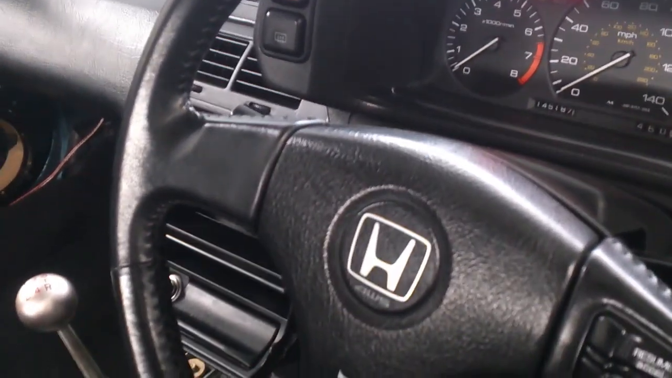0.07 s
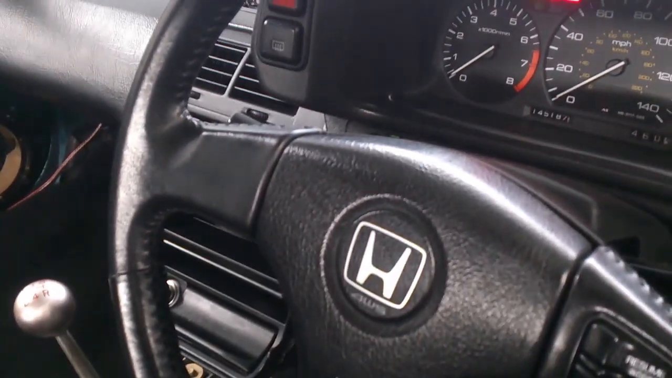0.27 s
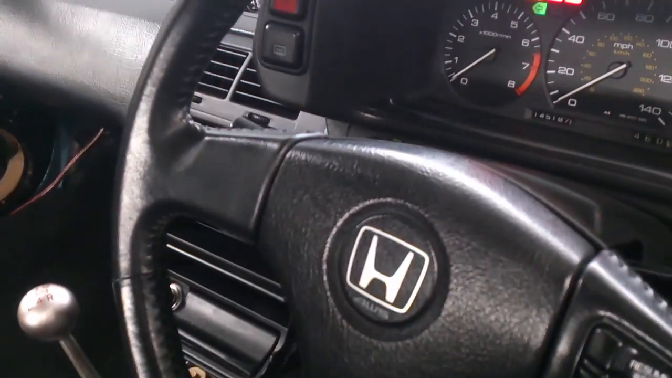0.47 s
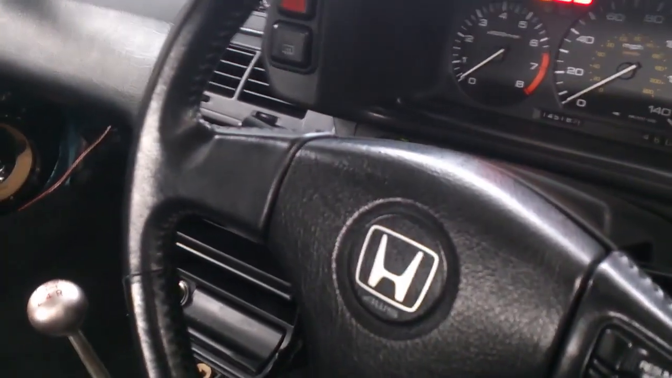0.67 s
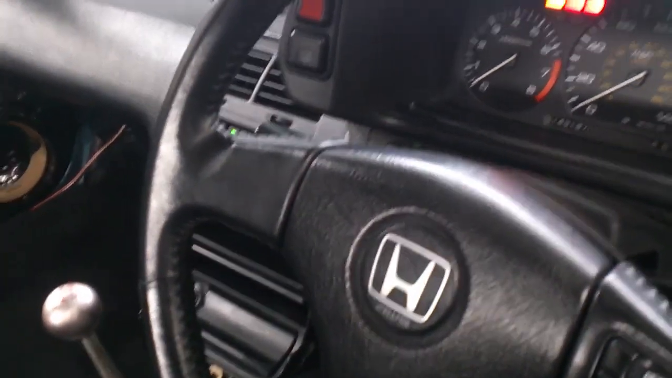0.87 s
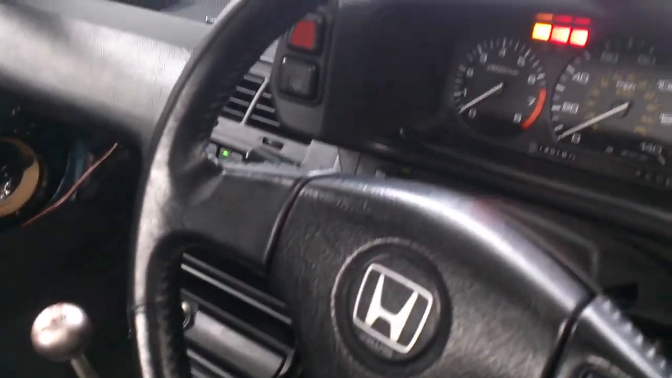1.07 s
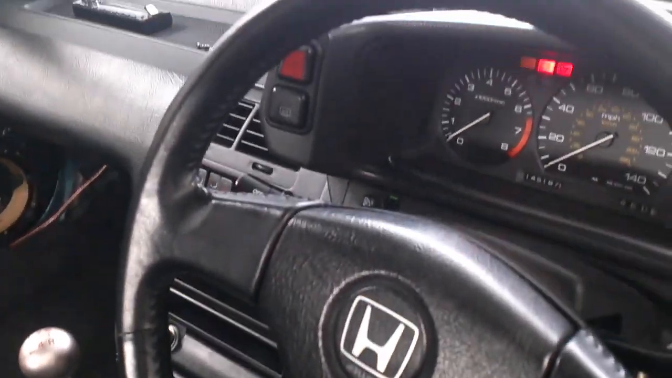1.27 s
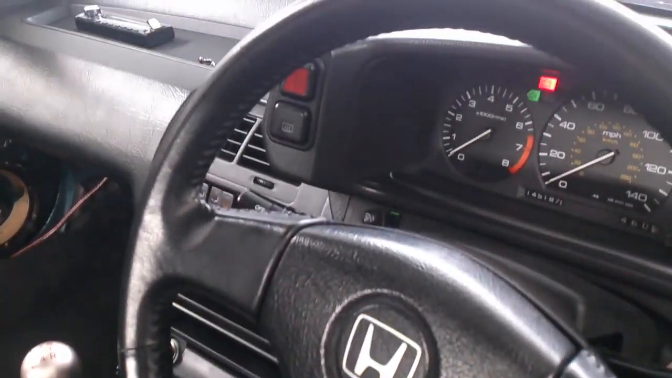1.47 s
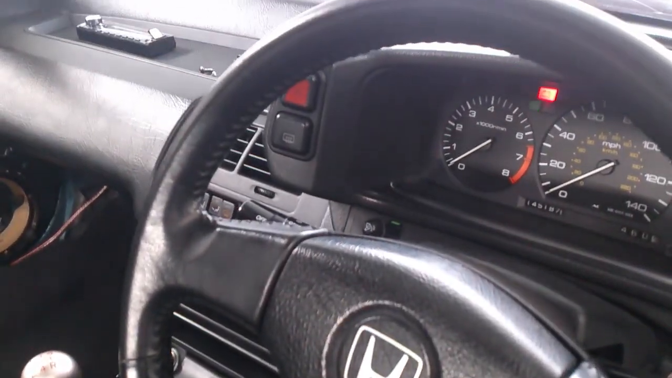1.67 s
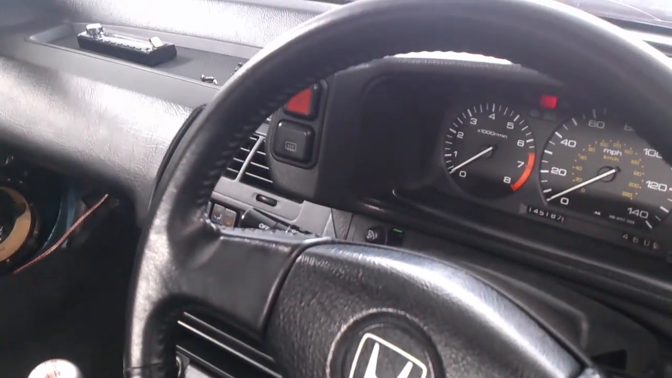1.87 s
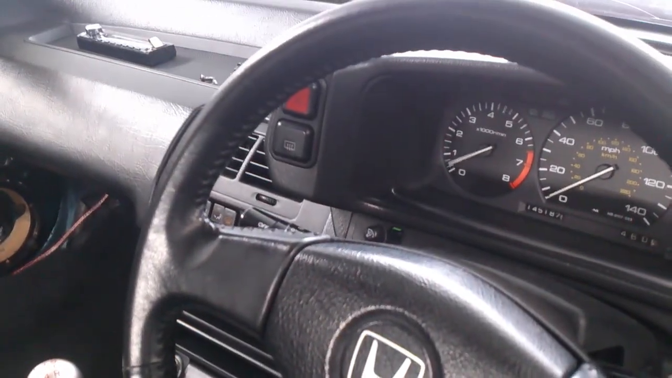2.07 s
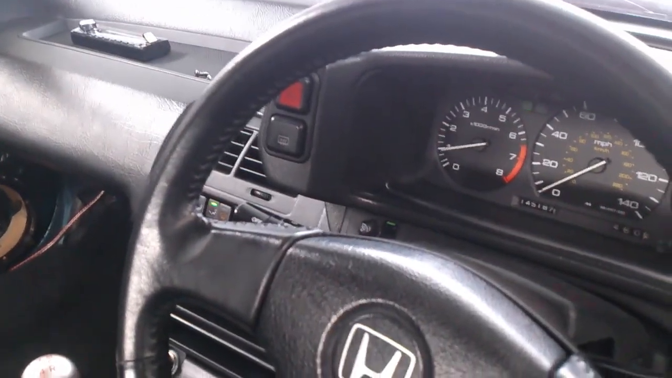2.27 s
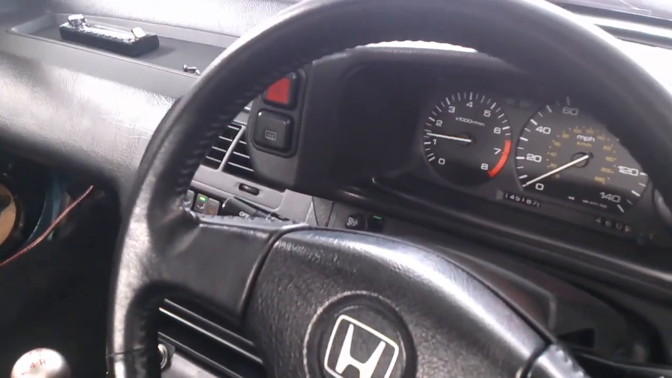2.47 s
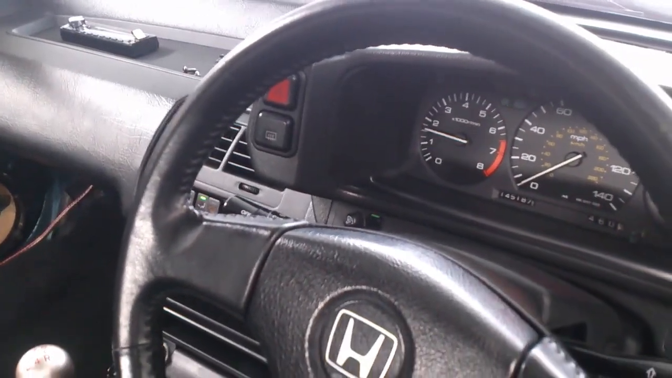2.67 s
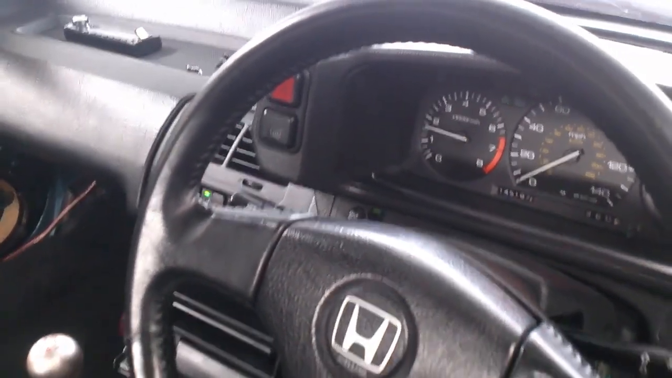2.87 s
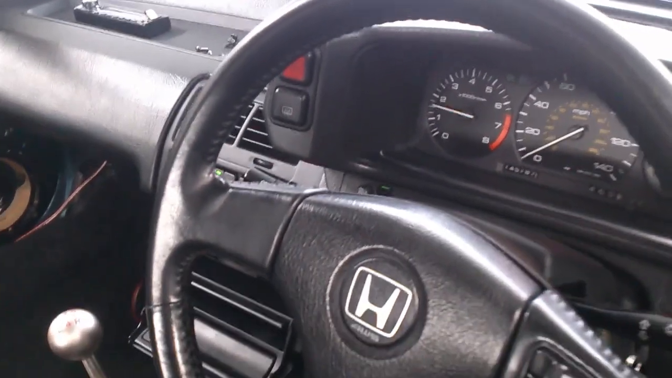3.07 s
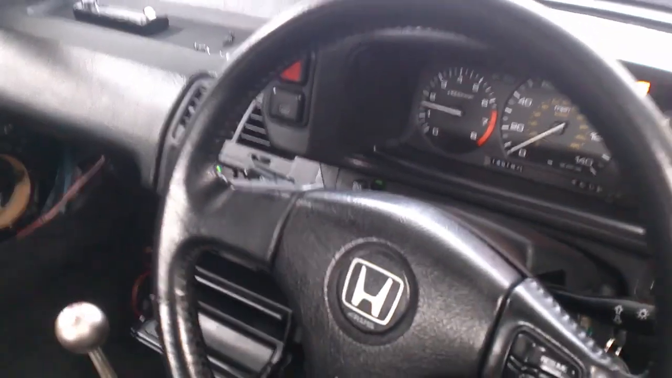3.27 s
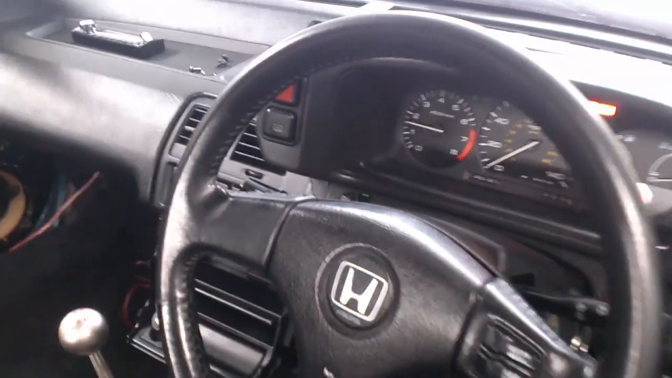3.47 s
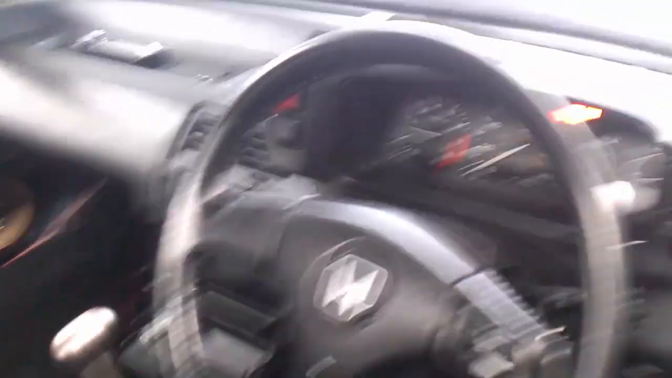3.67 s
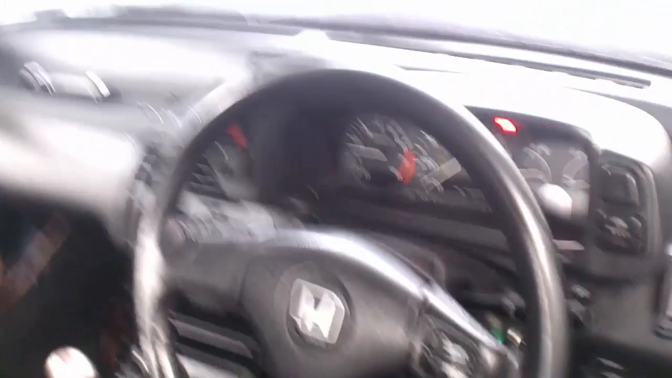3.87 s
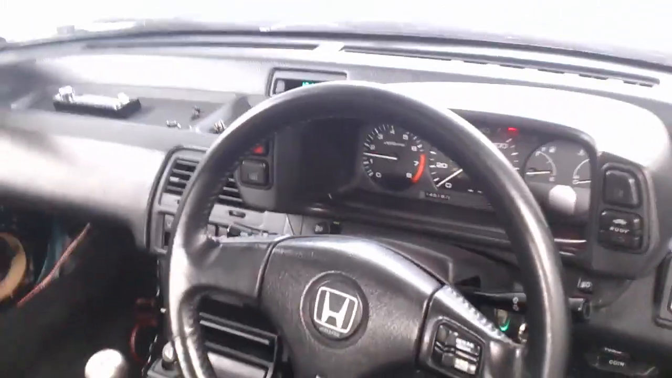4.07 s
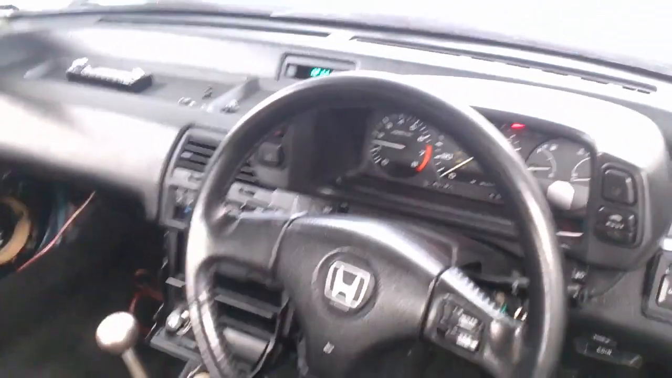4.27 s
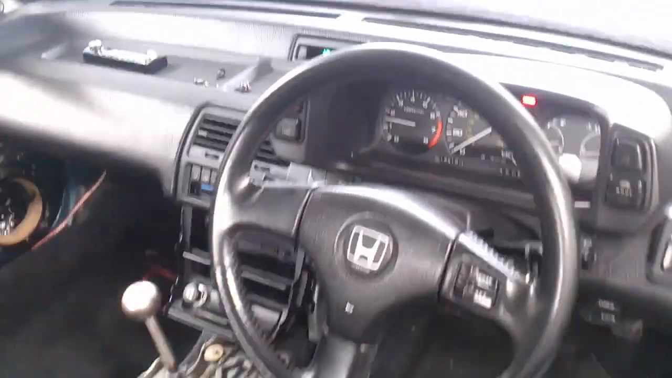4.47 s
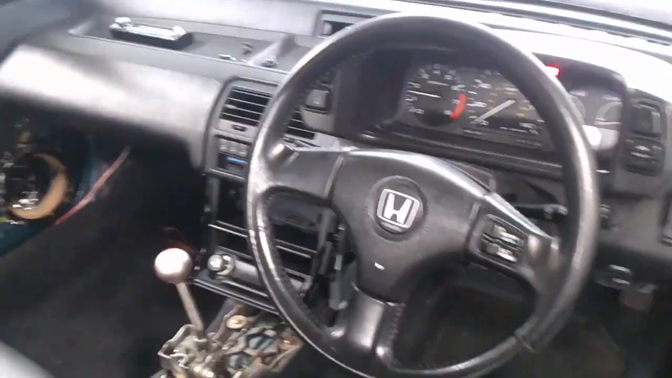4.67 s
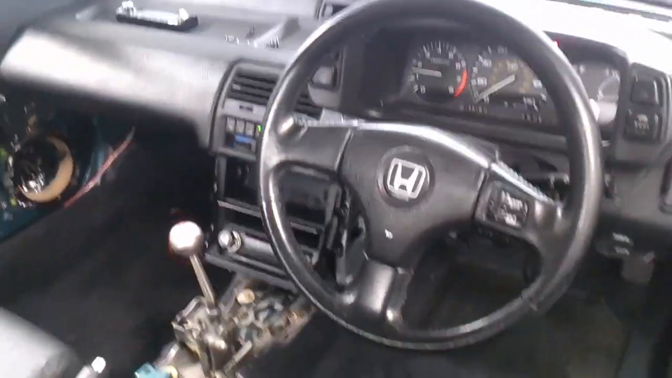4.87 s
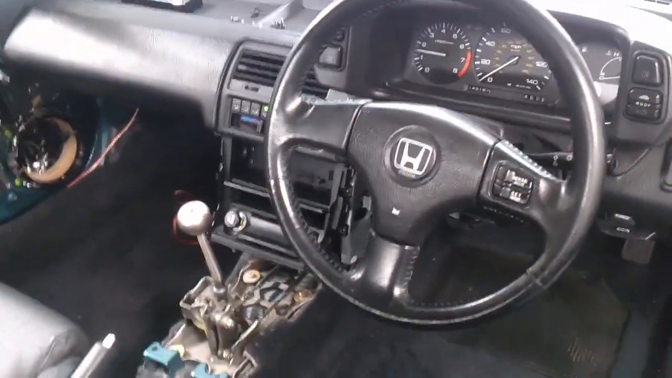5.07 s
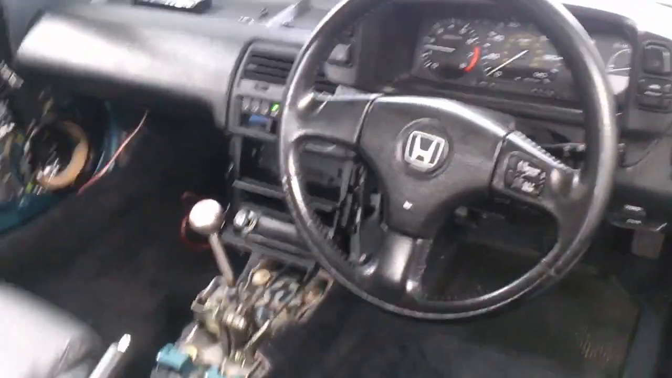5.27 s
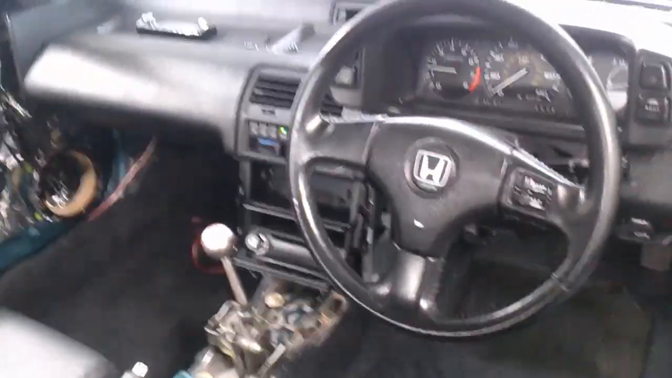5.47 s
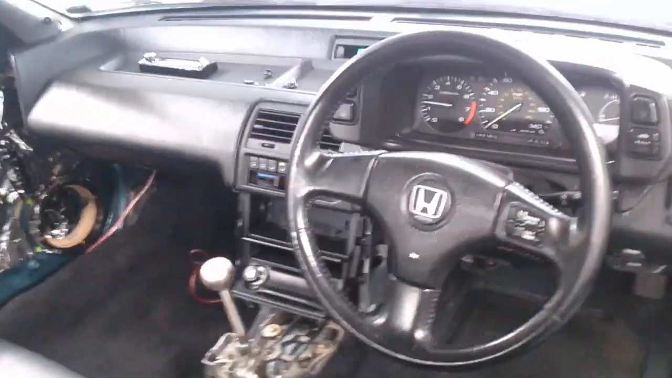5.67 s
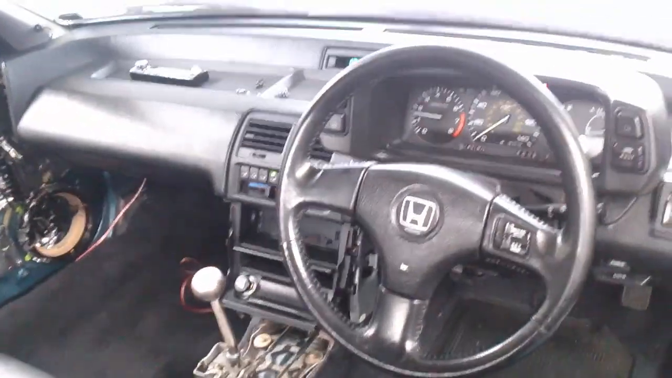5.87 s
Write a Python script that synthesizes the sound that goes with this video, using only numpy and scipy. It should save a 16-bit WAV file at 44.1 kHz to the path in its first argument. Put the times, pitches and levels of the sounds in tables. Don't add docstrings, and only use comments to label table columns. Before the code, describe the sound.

Key and relay clicks in a parked car, a gritty whining starter over three compressions, then the engine catches and settles into a booming fast idle.

```python
import sys
import numpy as np
from scipy import signal
from scipy.fft import rfft, irfft, next_fast_len
from scipy.io import wavfile

SR = 44100
rng = np.random.default_rng(int(sys.argv[2]) if len(sys.argv) > 2 else 0)


def gain_from_db(level_db):
    decades = np.asarray(level_db, float) / 20
    return 10 ** decades


def persist_wave(psi):
    counts = np.round(np.clip(psi, -1, 1) * 32767).astype(np.int16)
    wavfile.write(sys.argv[1], SR, np.atleast_2d(counts).T)


N = 261511
SIZE = next_fast_len(N + SR // 2)
TIME = np.arange(N) / SR
HZ = np.fft.rfftfreq(SIZE, 1 / SR) + 1e-3

# (frequency [Hz], density [dB per Hz])
AIRY_HISS = [(1470, -13), (2500, 3.5), (3210, -3.5), (3440, -2), (4800, -8), (5350, -9.5), (6550, -15),
             (12000, -10), (14700, -11), (16000, -17)]


def crank():
    # (time [s], speed [firings per s])
    speed = [(1.84, 17.5), (1.99, 19), (2.05, 16.3), (2.125, 17), (2.15, 27), (2.25, 32), (2.32, 33),
             (2.4, 42), (2.48, 49.5), (2.62, 55.1), (2.8, 54), (3.0, 52.1), (3.15, 50.8), (3.35, 50.1),
             (3.6, 49.5), (3.85, 49.4), (4.1, 49.6), (4.7, 50.8), (5.3, 51.5), (5.76, 51.6)]
    rate = np.interp(TIME, *np.transpose(speed))
    turn = 2 * np.pi * np.cumsum(rate) / SR
    turn = turn - turn[round(1.911 * SR)]
    uneven = np.exp(-np.maximum(TIME - 2.28, 0) / 0.27)
    first_firing = np.clip((TIME - speed[0][0]) / .04, 0, 1) ** 2
    return rate, turn, uneven, first_firing


def firing_orders(rate, turn, uneven, tone_db, warm_db):
    # (multiple of firing rate, level when even [dB], gain when uneven [dB], wander [dB])
    low_orders = [(2.0, -39.5, 8, 0), (3.0, -46.5, 14, -0.2), (4.0, -63, 20.5, 1.5), (.5, -53, -16, 3),
                  (1.5, -73, 28, 12)]
    # (multiple of firing rate, level [dB rms])
    upper_orders = [(4.5, -64.5), (5, -61), (5.5, -66), (6, -57.5), (6.5, -69), (7, -64), (7.5, -74),
                    (8, -59.5), (8.5, -67), (9, -60.5), (9.5, -68), (10, -66), (10.5, -67), (11, -60.5),
                    (12, -85), (13, -62), (14.5, -63), (15, -61), (18, -62), (19.5, -58), (21, -63.5),
                    (21.5, -65)]
    # (frequency [Hz], width [Hz], level [dB])
    boom = [(98.7, 5.2, -19), (135.2, 6.3, 9), (155.84, 2.47, -16), (165, 8.8, -6), (202, 1.8, -6),
            (219.6, 13.4, 14.5)]
    # (frequency [Hz], width [Hz], level [dB])
    cabin = [(268.5, 12, 6), (412, 11, 7), (441, 21, 8.5)]
    full_firing_db, slowest_hz = -17, 50.45
    upper_db = -6.5 + 1.0 * np.maximum(rate - slowest_hz, 0) + 1.44 * warm_db
    flare_db = np.maximum(held(2.38, 0.39, 5.6, rise=60, fall=36), 0)

    orders = [(0.99, tone_db, 0.051)]   # (order, level dB, wander dB)
    for k, db, gain_db, wander_db in low_orders:
        level_db = db + (gain_db + tone_db - full_firing_db) * uneven + humps(boom, k * rate)
        if k == 3:
            level_db = level_db + 0.73 * warm_db
        if k % 1 == 0:
            wander_db = wander_db + 2 * uneven
        orders.append((k, level_db, wander_db))
    for k, db in upper_orders:
        if k < 8:
            effort_db = 8.5 * uneven - 1.5
        else:
            effort_db = upper_db + flare_db * (k < 10)
        orders.append((k, db + effort_db + humps(cabin, k * rate), 1.6 + .3 * flare_db))

    tones = 0
    for k, db, wander_db in orders:
        start = rng.uniform(0, 2 * np.pi) * (k > 4)
        lean = .9 * (k - 1) * uneven
        sway = .012 * k * drift(9)
        tones = tones + gain_from_db(db + wander_db * drift(14)) * np.cos(k * turn + start - lean + sway)
    return np.sqrt(2) * tones


def block_noise(turn, body_db, throb_db):
    # (frequency [Hz], density [dB per Hz])
    block_body = [(100, -6), (170, -9), (206, -16), (300, -12), (613, -12.5), (864, -13), (1080, -10.5),
                  (1310, -14), (2110, -22), (6000, -39), (7800, -57), (13200, -120)]
    # (frequency [Hz], width [Hz], level [dB])
    panels = [(410, 160, 0), (1000, 32, 3), (1927, 15, 8.5), (2184, 580, 7)]
    # (frequency [Hz], width [Hz], throb [dB],
    # (time [s], length [s], level [dB], rise [dB per s], fall [dB per s]))
    barks = [(318, 200, 3.3, (2.1, 0.03, -48.5, 250, 63)), (469, 52, 2.5, (2.0, 0.14, -52.5, 200, 150)),
             (460, 60, 2.5, (2, 0, -51, 200, 200)), (470, 90, 2.5, (2.5, 0.1, -48, 200, 150)),
             (2050, 200, 1.5, (2.5, -0.42, -50, 60, 100))]
    noise = pair(at_hz(block_body) + humps(panels), grain_db=2.5)
    body = gain_from_db(body_db + throb_db + 0.21 * drift(25)) * noise
    for hz, width, pulse_db, shape in barks:
        air = rng.standard_normal(N)
        bark = rms_one(resonate(resonate(air, hz, width), hz, width))
        body = body + gain_from_db(held(*shape) + pulse_db * np.cos(turn)) * bark
    return body


def alternator():
    # (time [s], frequency [Hz], level [dB])
    slot_whine = [(2.9, 1078, -67), (3.3, 1144, -57.5), (4.2, 1156, -54.5), (4.45, 1086, -58.5),
                  (5.2, 1087, -56), (5.95, 1105, -57.5)]
    return flutter(slot_whine, rough_db=4.0, wobble=0.01217)


def engine():
    # (time [s], strength of firings [dB], air drawn in [dB])
    effort = [(1.84, -34, -56.5), (1.922, -21, -55), (1.97, -16.5, -52), (2.008, -15, -50),
              (2.065, -19, -47.5), (2.12, -12, -47.5), (2.188, -18.5, -48.5), (2.304, -14, -53),
              (2.4, -29, -53), (2.44, -15, -53), (2.56, -16.5, -54.5), (2.64, -21.5, -55.5),
              (2.8, -19.5, -57), (3.15, -19, -58), (3.73, -17.5, -57.5), (4.4, -15.5, -56),
              (5.06, -16.5, -55.5), (5.86, -16.5, -56.5)]
    rate, turn, uneven, first_firing = crank()
    tone_db, air_db = in_time(effort)
    idle_air_db = -60.5
    warm_db = 1.24 * np.maximum(TIME - 3.1, 0)
    release_db = held(2.2, .015, 5.5, rise=350, fall=140)
    hiss_db = air_db + np.maximum(release_db, 0)
    body_db = -48 + 0.4 * (hiss_db - idle_air_db) + warm_db
    throb_db = 1.6 * np.cos(turn) + .6 * np.cos(turn / 2)

    tones = firing_orders(rate, turn, uneven, tone_db, warm_db)
    body = block_noise(turn, body_db, throb_db)
    hiss_gain = gain_from_db(hiss_db - 1.5 + 0.069 * throb_db + 0.19 * drift(42))
    hiss = hiss_gain * pair(at_hz(AIRY_HISS) + band(2900, 12600))
    return (tones + body) * first_firing + hiss + alternator()


def body_kicks():
    # (time [s], peak level [dB], ring [Hz], decay t60 [s])
    kick_rows = [(1.85, -15.5, 22.5, 0.35), (2.022, -19, 47.5, 0.37), (2.139, -20, 45, 0.18),
                 (1.868, -27, 24, .2), (2.012, -30, 95, 0.1), (2.1, -30.5, 40, .15), (2.13, -33, 95, .1),
                 (1.93, -39, 140, 0.09), (2.03, -32, 131, 0.1), (2.06, -29, 40, .15), (2.2, -35, 130, .12),
                 (2.279, -30, 90, .12)]
    out = 0
    for s, db, hz, t60 in kick_rows:
        t = np.maximum(TIME - s, 0)
        push = np.minimum(4 * hz * t, 1)
        out = out - gain_from_db(db - 60 * t / t60) * np.sin(2 * np.pi * hz * t) * push
    return out


def starter_grind():
    # (time [s], length [s], grind level [dB], swell [dB per s])
    strokes = [
        (1.248, 0.15, -40, -14),
        (1.47, .12, -47, 57),
        (1.72, 0.049, -43.5, 12),
    ]
    # (frequency [Hz], density [dB per Hz])
    grind_colour = [(130, -53), (225, -8), (446, -12), (501, -18), (564, -5.5), (926, -4.5), (1340, -1),
                    (1480, -0.5), (5000, -26.5), (6500, -28), (11000, -120)]
    # (frequency [Hz], width [Hz], level [dB])
    housing = [(456, 15, 15), (919, 18, 11), (1090, 21, 10), (1970, 24, 8), (2255, 27, 14.5), (2840, 90, 8),
               (3210, 55, 11)]
    grind_gain = hiss_gain = 0
    for k, (s, length, db, swell) in enumerate(strokes):
        into = np.clip(TIME - s, 0, length)
        rise = 400 if k else 900
        level_db = held(s, length, db, rise, fall=162) + swell * into
        grind_gain = grind_gain + gain_from_db(level_db)
        hiss_gain = hiss_gain + gain_from_db(level_db - 11 - 54 * into)
    grind_noise = pair(at_hz(grind_colour) + humps(housing), grain_db=0.5)
    hiss_noise = pair(at_hz(AIRY_HISS) + band(3300, 10400), grain_db=3.0)
    grind = grind_gain * gain_from_db(1.4 * drift(45.15)) * grind_noise
    hiss = hiss_gain * gain_from_db(5 + 1.0 * drift(40.6)) * hiss_noise
    return grind + hiss


def starter_whine():
    # (time [s], length [s], start frequency [Hz], end frequency [Hz], level [dB])
    whine = [(1.273, 0.085, 905, 935, -47.5), (1.325, 0.065, 1985, 1950, -45),
             (1.345, 0.041, 1075, 1100, -48.5), (1.35, 0.038, 1100, 1150, -49),
             (1.385, 0.094, 2270, 2240, -58), (1.66, .05, 2280, 2260, -62),
             (1.443, 0.134, 1560, 1463, -43.5), (1.56, 0.07, 2290, 2290, -53.5),
             (1.535, .045, 1300, 1500, -47), (1.45, 0.117, 880, 930, -59), (1.59, 0.047, 1200, 1150, -54),
             (1.495, 0.095, 285, 230, -56.5), (2, 0.043, 1460, 1420, -39.5), (1.695, .05, 1710, 1580, -43),
             (1.72, .035, 1540, 1480, -49), (2.5, 0.049, 1300, 1380, -58), (2.24, .33, 2250, 1980, -59),
             (1.26, 0.064, 2250, 2230, -56.5), (1.36, .05, 1450, 1300, -59), (1.47, 0.098, 1150, 1100, -61),
             (1.73, 0.058, 2270, 2230, -57.5), (1.24, 0.039, 2850, 2780, -53.5),
             (1.72, 0.058, 3300, 3200, -59), (1.28, .03, 1600, 1420, -50), (1.55, .06, 2200, 1980, -54),
             (1.72, .06, 960, 1000, -55), (1.705, 0.053, 630, 560, -60), (1.62, 0.063, 450, 450, -62),
             (1.79, 0.045, 480, 440, -58), (1.57, .03, 950, 920, -50), (1.37, 0.032, 1740, 1900, -56),
             (1.71, 0.085, 320, 270, -60.5)]
    in_s, out_s, edge_db = 0.013, 0.012, -18
    out = 0
    for s, length, from_hz, to_hz, db in whine:
        glide = [(s - in_s, from_hz, db + edge_db),
                 (s, from_hz, db),
                 (s + length, to_hz, db),
                 (s + length + out_s, to_hz, db + edge_db)]
        out = out + flutter(glide, rough_db=1.8, wobble=.014, twin=gain_from_db(-7))
    return out


def key_and_relays():
    # (time [s], peak level [dB], ring [Hz], crack over ring [dB], scrape t60 [s])
    click_rows = [(.199, -43, 520, -28, .05), (.207, -37, 550, -22, 0.099), (.232, -46, 950, -17, 0.037),
                  (.256, -43, 990, -15, 0.074), (.265, -40, 1030, -14, .04),
                  (.2735, -38.5, 1210, -9, 0.064), (.29, -47, 801, -10, .05), (.303, -47, 902, -10, .05),
                  (.333, -47, 620, -18, .04), (.3495, -44, 1160, -32, 0.037), (.434, -54, 657, -20, .044),
                  (.5255, -47.5, 560, -12, 0.05), (.522, -54, 1700, -20, .03), (.529, -48, 1000, -6, 0.059),
                  (.884, -55, 586, -7, 0.058), (1.113, -49.5, 1090, -15, .06),
                  (1.115, -51.5, 560, -20, .06), (1.183, -49.5, 566, -7, 0.12),
                  (1.234, -40, 1110, 7.5, 0.044), (1.255, -39, 171, -30, 0.28),
                  (2.6, -30.5, 602, -60, 0.13), (2.619, -42, 623, -62, 0.024)]
    return clicks(click_rows, left_db=8.4, grip=0.12, crack_hz=2500, spread=0.21)


def bright_ticks():
    # (time [s], peak level [dB], ring [Hz], crack over ring [dB], scrape t60 [s])
    tick_rows = [
        (.208, -62, 900, 14, .01),
        (.2565, -55, 900, 18, .015),
        (.527, -68, 900, 10, .02),
        (3.8205, -46, 900, 17, 0.0067),
        (3.926, -62, 900, 14, .008),
    ]
    return clicks(tick_rows, left_db=3.0, grip=.5, crack_hz=12000, spread=.5)


def latch():
    # (time [s], peak level [dB], ring [Hz], crack over ring [dB], scrape t60 [s])
    latch_rows = [
        (.467, -60.5, 650, 14.5, 0.046),
        (.478, -62, 656, 11, .04),
    ]
    return clicks(latch_rows, left_db=9.0, grip=.5, crack_hz=4180, spread=0.23)


def case_snaps():
    # (time [s], peak level [dB], ring [Hz], crack over ring [dB], scrape t60 [s])
    snap_rows = [(.467, -48.5, 656, -0.5, 0.13), (3.802, -21.5, 557, -8, 0.0044),
                 (3.8022, -26, 950, -43, 0.0034), (3.8055, -46, 697, 10, .004),
                 (3.8185, -42, 900, 15, 0.011), (3.8212, -15, 1120, -1, 0.0084),
                 (3.8315, -46, 900, 3, .006), (3.8428, -31.5, 510, -45, 0.006),
                 (3.8432, -36, 1350, -45, .006), (4.3715, -26, 980, -22, .006),
                 (4.372, -35, 2100, -30, .006), (3.9255, -36.5, 900, 7.5, 0.011)]
    return clicks(snap_rows, left_db=11.5, grip=0.65, crack_hz=3240, spread=.25, touch=-46, snap=4.9)


def cloth_rubs():
    # (time [s], length [s], level [dB], bright level [dB])
    rubs = [
        [(0.0, 0.26, -61, -53.5), (.262, 0.057, -55, -56.5), (.33, 0.038, -67, -65)],
        [(3.764, 0.0083, -61, -57)],
        [(3.862, 0.034, -58, -56), (3.93, .02, -64, -60)],
        [(3.953, 0.012, -49.5, -53), (3.977, 0.015, -55, -52.5), (4.006, .004, -59, -60)],
        [(4.883, 0.038, -56.5, -55.5)],
        [(5.095, 0.016, -44.5, -55), (5.11, 0.025, -45.5, -56)],
    ]
    # (low edge [Hz], high edge [Hz], resonance [Hz], width [Hz], level [dB])
    cloths = [(243, 2600, 160, 820, 11), (2000, 6200, 12000, 900, 14.5), (3500, 7800, 6000, 1500, 1),
              (2400, 4600, 4230, 200, 11), (1762, 4500, 2400, 720, 7), (1318, 6000, 2320, 3000, 18.5)]
    bright = pair(at_hz(AIRY_HISS) + band(8700, 10800), grain_db=3.5)
    out = 0
    for strokes, (lo_hz, hi_hz, *mode) in zip(rubs, cloths):
        cloth = pair(2 * band(lo_hz, hi_hz) + humps([mode]), grain_db=3.5)
        for s, length, body_db, bright_db in strokes:
            stroke = gain_from_db(held(s, length, 0, rise=598, fall=339))
            out = out + stroke * (gain_from_db(body_db + 1.0) * cloth + gain_from_db(bright_db - 3.5) * bright)
    return gain_from_db(1.4 * drift(60)) * out


def pedal_squeak():
    # (time [s], frequency [Hz], level [dB])
    squeak = [(.344, 1150, -52), (.354, 1150, -43), (.366, 1130, -62), (.377, 1120, -50), (.389, 1110, -62),
              (.398, 1130, -51), (.408, 1140, -68), (.416, 1150, -59), (.428, 1160, -68), (.44, 1170, -64),
              (.49, 1170, -72)]
    return flutter(squeak, rough_db=1.5, wobble=.008, attack_s=.008)


def seat_creak():
    # (time [s], frequency [Hz], level [dB])
    creak = [
        (5.085, 2834, -60),
        (5.105, 2710, -53),
        (5.125, 2175, -54),
        (5.155, 1720, -52),
    ]
    return flutter(creak, rough_db=3.0, wobble=0.1)


def shake():
    # (frequency [Hz], density [dB per Hz])
    rumble_colour = [(10, -8), (18, -1), (34, 0), (52, -6), (75, -25), (110, -38), (300, -48), (1200, -95)]
    # (time [s], length [s], level [dB], rise [dB per s], fall [dB per s])
    jolts = [
        (0.0, 0.29, -50, 90, 90),
        (0.3, 0.017, -44, 69, 270),
        (0.382, 0.3, -57, 90, 9),
        (1.168, .005, -49, 289, 250),
        (1.276, .01, -43, 370, 112),
        (1.392, 0.013, -35.5, 220, 95),
        (1.558, 0.061, -34, 190, 120),
        (1.75, 0.053, -36, 120, 250),
        (1.943, 0.02, -36, 157, 60),
        (2.194, .55, -38, 58, 5.5),
    ]
    grips = [
        (0.0, 0.34, 17, 200, 200),
        (.4, 0.32, 8.7, 100, 100),
        (1.24, 0.076, 11, 299, 200),
        (1.97, 0.46, 20, 120, 60),
    ]
    rumble = pair(at_hz(rumble_colour))
    above_60_hz = signal.butter(1, 60, "high", fs=SR, output="sos")
    knock = signal.sosfiltfilt(above_60_hz, rumble)
    jolt_gain = gain_from_db(np.max([held(*jolt) for jolt in jolts], axis=0))
    return jolt_gain * (rumble + sum(gain_from_db(held(*grip)) for grip in grips) * knock)


def clicks(contacts, left_db, grip, crack_hz, spread, touch=7, snap=0):
    # (multiple of ring frequency, width [Hz], level [dB])
    trim = [(.55, 196, 0.5), (1.0, 122, 15), (1.8, 292, -37), (2.7, 500, -50)]
    out = np.zeros((2, N))
    t = np.arange(SR // 5) / SR
    for s, db, hz, crack_db, t60 in contacts:
        t60 = max(t60, .003)
        scrape = rng.standard_normal((3, len(t))) * gain_from_db(-60 * t / t60)
        scrape[0, 0] = touch
        scrape[1:, 3] += snap
        damping = grip / t60
        ring = 0
        for k, width, mode_db in trim:
            ring = ring + gain_from_db(mode_db) * resonate(scrape[0], k * hz, width + damping)
        if crack_db < -40:
            ring = resonate(ring, hz, hz)
        edge = gain_from_db(-32) * np.diff(scrape[1:], prepend=0)
        crack = resonate(scrape[1:], crack_hz, spread * crack_hz) + edge
        hit = ring / np.abs(ring).max() + gain_from_db(crack_db) * crack / np.abs(crack).max()
        i = round(s * SR)
        out[:, i:i + len(t)] += gain_from_db(db) * hit * gain_from_db([[left_db / 2], [-left_db / 2]])
    return out


def flutter(rows, rough_db, wobble, twin=0, attack_s=.027):
    s, hz, db = np.transpose(rows)
    on = slice(round(s[0] * SR), round(s[-1] * SR))
    t = TIME[on]
    swell = np.interp(t, [s[0], s[0] + attack_s, s[-1] - .015, s[-1]], [0, 1, 1, 0])
    pitch = np.interp(t, s, hz) * (1 + wobble * drift(140, t))
    turn = 2 * np.pi * np.cumsum(pitch) / SR
    level = gain_from_db(np.interp(t, s, db) + 6.5 + rough_db * drift(90, t))
    out = np.zeros(N)
    out[on] = swell * level * (np.sin(turn) + twin * np.sin(.94 * turn))
    return out


def pair(colour_db, grain_db=0.):
    # (frequency [Hz], share common to both ports)
    likeness = [(40, 0.79), (400, 1), (900, 0.48), (1200, 0.46), (2000, 0.15), (5000, 0.039)]
    grain = gain_from_db(grain_db * np.minimum(rng.exponential(1, SIZE), 5))
    common, left, right = rfft(rng.standard_normal((3, SIZE)) * grain)
    alike = np.clip(at_hz(likeness), 0, 1)
    both = np.sqrt(alike) * common + np.sqrt(1 - alike) * np.array([left, right])
    return rms_one(irfft(both * gain_from_db(colour_db), SIZE)[:, :N])


def resonate(x, hz, width):
    r = np.exp(-np.pi * width / SR)
    poles = [1, -2 * r * np.cos(2 * np.pi * hz / SR), r * r]
    return signal.lfilter([(1 - r * r) / 2, 0, (r * r - 1) / 2], poles, x)


def held(s, length, db, rise, fall):
    return db - rise * np.maximum(s - TIME, 0) - fall * np.maximum(TIME - s - length, 0)


def drift(rate, at=TIME):
    count = int(N * rate // SR + 2)
    return np.interp(at * rate, np.arange(count), rng.standard_normal(count)) * np.sqrt(3 / 2)


def in_time(rows):
    s, *columns = np.transpose(rows)
    return [np.interp(TIME, s, c, left=-120) for c in columns]


def at_hz(points):
    hz, value = np.transpose(points)
    return np.interp(np.log(HZ), np.log(hz), value)


def humps(modes, at=HZ):
    return sum(db / (1 + (2 * (at - hz) / width) ** 2) for hz, width, db in modes)


def band(lo_hz, hi_hz):
    return -10 * np.log10((1 + (lo_hz / HZ) ** 4) * (1 + (HZ / hi_hz) ** 8))


def rms_one(x):
    return x / np.sqrt(np.mean(x ** 2) + 1e-20)


def scene():
    car = engine() + body_kicks() + starter_grind() + starter_whine()
    contacts = key_and_relays() + bright_ticks() + latch() + case_snaps()
    return car + contacts + cloth_rubs() + pedal_squeak() + seat_creak() + shake()


def microphone_ports(dry):
    # (frequency [Hz], left over right [dB])
    left_over_right = [(60, 11.0), (110, 5), (200, 3.5), (380, 0), (700, 1.5), (1290, -1), (2380, -6.5),
                       (4400, -8.5), (8120, -9), (15000, -20.5)]
    # (frequency [Hz], phase lead [radians])
    right_lead = [(50, 1), (130, 0.72), (330, -0.025), (600, -0.45), (1000, -1.1), (1500, 0.028),
                  (2500, -1.4)]
    ratio = gain_from_db(at_hz(left_over_right))
    even = 2 / (1 + ratio) / (1 + (15 / HZ) ** 2)
    left = even * ratio * np.exp(-2j * np.pi * HZ * 18 / SR)
    right = even * np.exp(1j * at_hz(right_lead))
    tail = SIZE - N
    after = dry[:, :-tail - 1:-1] * np.linspace(1, 0, tail) ** 4
    before = dry[:, tail:0:-1] * np.linspace(0, 1, tail) ** 4
    running_on = np.hstack([dry, after + before])
    return irfft(rfft(running_on, SIZE) * [left, right], SIZE)[:, :N]


def recorder_noise():
    # (frequency [Hz], density [dB per Hz])
    self_noise = [(59, -22), (100, 8.5), (160, -1), (350, -2.5), (1680, -11.5), (5530, -15), (6020, -15.5),
                  (7770, -21), (9820, -7), (11600, -15), (16000, -17)]
    # (frequency [Hz], width [Hz], level [dB])
    right_port = [(5830, 250, 25), (9800, 1000, 15.5)]
    colour_db = at_hz(self_noise) + humps(right_port) * np.array([[-.75], [.25]])
    own = rfft(rng.standard_normal((2, SIZE))) * gain_from_db(colour_db)
    hiss = gain_from_db(-65 + 3.5) * rms_one(irfft(own, SIZE)[:, :N])
    whistle = gain_from_db(-66 + 2 * drift(14.0)) * np.sin(2 * np.pi * 9718 * TIME) * [[.1], [1]]
    return hiss + whistle


def soft_limit(x):
    knee, headroom = .4, .16
    over = np.maximum(np.abs(x) - knee, 0)
    return x - np.sign(x) * (over - headroom * np.tanh(over / headroom))


def top_cut(x):
    return signal.sosfilt(signal.butter(12, 15790, fs=SR, output="sos"), x)


def record(dry):
    heard = soft_limit(microphone_ports(dry) + recorder_noise())
    heard = signal.sosfilt(signal.cheby2(12, 60, 16400, fs=SR, output="sos"), heard)
    heard = heard * np.clip((TIME[-1] - TIME) / .005, 0, 1)
    return top_cut(heard)


dry = scene()
out = record(dry)
persist_wave(out)
```